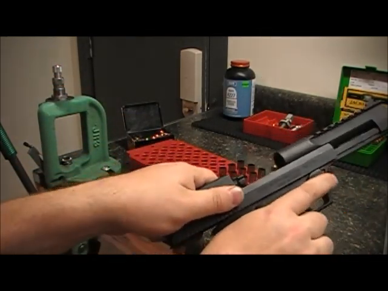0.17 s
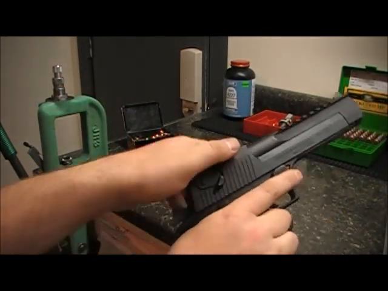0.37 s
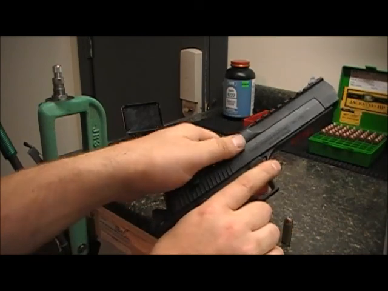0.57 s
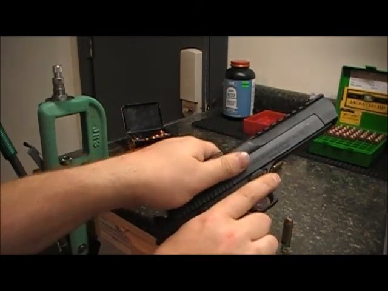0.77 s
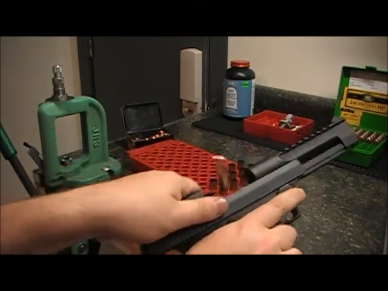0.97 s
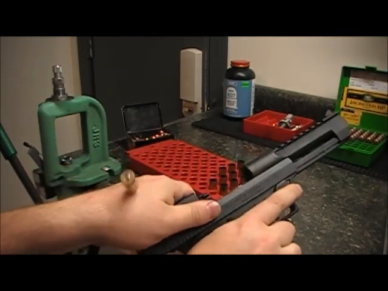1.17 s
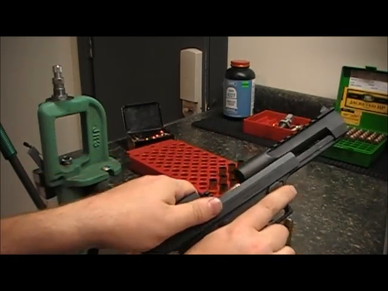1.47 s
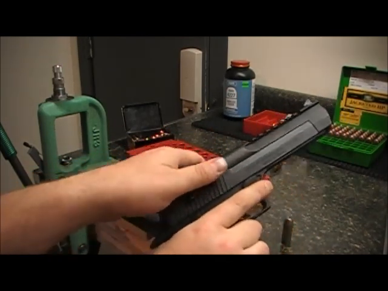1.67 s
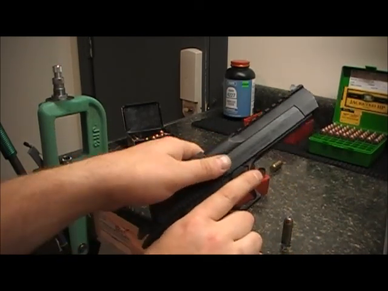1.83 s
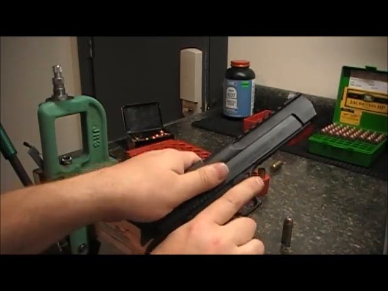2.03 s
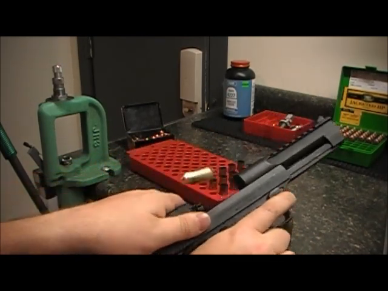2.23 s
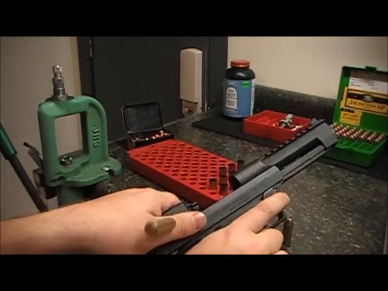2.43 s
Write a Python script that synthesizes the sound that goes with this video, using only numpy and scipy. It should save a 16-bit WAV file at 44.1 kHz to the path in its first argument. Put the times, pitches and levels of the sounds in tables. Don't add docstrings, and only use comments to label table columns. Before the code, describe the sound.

Loud steel clacks and scrapes of a big handgun's slide being worked, ejected rounds clicking on a countertop

```python
import sys
import numpy as np
from scipy import signal
from scipy.fft import rfft, irfft
from scipy.io import wavfile
from scipy.ndimage import uniform_filter1d

SR = 44100
rng = np.random.default_rng(int(sys.argv[2]) if len(sys.argv) > 2 else 0)


def amplitude_ratio(level_db):
    exponent = np.asarray(level_db, float) / 20
    return 10 ** exponent


def store_pcm(level_fs):
    pcm = np.round(np.clip(level_fs, -1, 1) * 32767).astype(np.int16)
    wavfile.write(sys.argv[1], SR, np.atleast_2d(pcm).T)


N = 114660


def evened(x):
    return x / np.sqrt(np.mean(x ** 2) + 1e-20)


def peaked(x):
    return x / (abs(x).max() + 1e-12)


def read(points, hz):
    f, value = np.transpose(points)
    return np.interp(np.log(hz + 1), np.log(f + 1), value)


def add(mix, s, sound):
    part = mix[round(s * SR):][:len(sound)]
    part += sound[:len(part)]


def strike(mix, s, db, lift, sound):
    add(mix, s, amplitude_ratio(db) * lift[round((s + 0.002) * SR)] * sound)


def colour(points, size=512):
    hz = abs(np.fft.fftfreq(4096, 1 / SR))
    log_gain = np.log(amplitude_ratio(read(points, hz)))
    return np.fft.ifft(np.exp(np.conj(signal.hilbert(log_gain)))).real[:size]


def shaped(points):
    gain = amplitude_ratio(read(points, np.fft.rfftfreq(N, 1 / SR)))
    return evened(irfft(rfft(rng.standard_normal(N)) * gain, N))


def ring(modes, length, spread_db, detune=0.0047):
    hz, db, t60 = np.transpose(modes)[:, :, None]
    t = np.arange(0, length, 1 / SR)
    chance = rng.standard_normal((len(modes), 2))
    decay = amplitude_ratio(db + spread_db * chance[:, :1] - 60 * t / t60)
    tone = np.sin(2 * np.pi * hz * (1 + detune * chance[:, 1:]) * t)
    return (decay * tone).sum(0)


# f/Hz, level/dB
FLOOR_MID_SPECTRUM = [(30, -18), (200, -6), (500, -8), (1500, 0), (3500, 0), (8000, -3), (12500, -8),
                      (14500, -30)]
FLOOR_SIDE_SPECTRUM = [(30, -18), (300, 0), (4000, -5), (14000, -54)]


def background():
    return np.array([amplitude_ratio(-60) * shaped(FLOOR_MID_SPECTRUM), amplitude_ratio(-65) * shaped(FLOOR_SIDE_SPECTRUM)])


def mains_hum():
    return amplitude_ratio(-81) * np.sin(2 * np.pi * 120 * np.arange(N) / SR)


# f/Hz, level/dB, t60/s
KNOCK_MODES = [(850, -3, 0.004), (1360, 0.5, 0.0018), (1800, 13, 0.0027), (2870, 4, 0.0076)]


def distant_knock():
    out = np.zeros(N)
    add(out, 0.0074, amplitude_ratio(-23) * ring(KNOCK_MODES, 0.067, 0))
    return out


# f/Hz, t60/s
ROOM_DECAY = [(300, 0.91), (1200, 0.44), (3500, 0.46), (8000, 0.41), (13000, 0.25)]
# f/Hz, level/dB
ROOM_MID_SPECTRUM = [(300, -5), (800, 6.5), (2000, 5), (8000, 4.5), (13000, 6)]
ROOM_SIDE_SPECTRUM = [(200, -32), (700, -22.5), (2500, -1.5), (8000, 0.5), (13000, 9.5)]


def room(x):
    spacing, delay_s, rise_s = 20, 0.00048, 0.0024
    taps = np.zeros((2, SR))
    at = np.arange(0, SR - spacing, spacing) + rng.integers(0, spacing, (2, (SR - 1) // spacing))
    np.put_along_axis(taps, at, rng.choice([-1., 1.], at.shape), 1)
    hz, t, bands = signal.stft(taps, SR, nperseg=256)
    spectrum = np.array([read(ROOM_MID_SPECTRUM, hz), read(ROOM_SIDE_SPECTRUM, hz)])
    db = spectrum[:, :, None] - 60 * t / read(ROOM_DECAY, hz)[:, None]
    tail = signal.istft(bands * amplitude_ratio(db), SR, nperseg=256)[1][:, :SR] / 50
    tail = tail * np.clip((np.arange(SR) / SR - delay_s) / rise_s, 0, 1) * 2
    return signal.fftconvolve(x[None], tail, axes=1)[:, :N]


# f/Hz, level/dB, t60/s
FRAME_MODES = [(745, -22.5, 0.075), (913, -5.5, 0.033), (1500, -5, 0.097), (1820, -4, 0.045),
               (2200, 5.5, 0.025), (2500, 6, 0.013), (2965, 12, 0.007), (3850, 22, 0.0025)]
SLIDE_MODES = [(5270, -34, 0.0035), (6660, -19, .006), (7260, 1, 0.0041), (8180, 1, 0.015),
               (8450, 7.5, 0.0025), (9250, 11, 0.0023), (10400, -4, 0.0073)]
# f/Hz, level/dB
CRACK_SPECTRUM = [(200, -52.5), (600, -17.5), (2000, 0), (4800, -3.5), (8500, -2), (12500, -12.5),
                  (15500, -50)]


def clack(treble_db, length, own_hz):
    t = np.arange(0, 0.06, 1 / SR)
    grit = rng.standard_normal(len(t)) * amplitude_ratio(1.5 * rng.exponential(1, len(t)))
    drive = grit * np.minimum(t / 0.00024, 1) * amplitude_ratio(-30 * t / max(length, 1e-3))
    frame = evened(ring(FRAME_MODES, 0.04, spread_db=2))
    slide = evened(ring(SLIDE_MODES, 0.04, spread_db=2))
    body = amplitude_ratio(-treble_db / 2) * frame + amplitude_ratio(treble_db / 2) * slide
    body = body / np.linalg.norm(body) * min(length / 0.018, 1)
    own = ring([(own_hz, 0, 35 / own_hz)], 0.03, 0, 0)
    add(body, 0, amplitude_ratio(-2) * own / np.linalg.norm(own))
    tilted = [(hz, db + treble_db * (np.clip(hz / 5000, 0.5, 1.5) - 1)) for hz, db in CRACK_SPECTRUM]
    crack = colour(tilted)
    add(body, 0, amplitude_ratio(5) * crack / np.linalg.norm(crack))
    return peaked(signal.fftconvolve(drive, body))


# t/s, heard peak level/dB, treble share/dB, length/s, loudest ring f/Hz
SLIDE_HOME = [(.168, -17.5, 5, 0.008, 6840), (0.201, -8, -3, 0.0081, 1430), (0.183, -45, -32, 0.014, 500),
              (0.2047, -4, -3, 0.012, 2190), (0.2185, -10.5, 3, 0.017, 2500),
              (0.2452, -13, -4, 0.014, 8500), (0.2474, -9, -4, .012, 2270),
              (0.2548, 0.5, -8.5, 0.014, 2000), (0.265, 1.5, 4.5, 0.028, 8150), (0.2805, -5, 4, 0.14, 7400),
              (0.285, -6.5, 1, 0.06, 8200), (1.4352, -15, -3, 0.013, 2800),
              (1.4433, -5.5, -0.5, 0.0086, 8140), (1.475, -18.5, -9, 0.0057, 2720),
              (1.506, -16, -13, 0.013, 2500), (1.523, -17.5, -16, 0.032, 2200),
              (1.529, -17.5, -17, 0.03, 2350), (1.534, -14, -8, .015, 2320), (1.5407, -1, -1, 0.018, 2270),
              (1.5447, 2.5, -1.5, 0.004, 3490), (1.5539, 0.5, 11, 0.011, 6860),
              (1.568, -4.5, 31, 0.046, 9600), (1.575, -0.5, 4.5, 0.04, 7300), (1.585, -4.5, 2, 0.037, 9400)]
FIRST_PULL = [(0.846, -27, -18, 0.0046, 2340), (0.8477, -16, -8, 0.008, 3650),
              (0.859, -14.5, -20, 0.012, 1710), (0.8697, -17, 18, 0.0055, 7500),
              (0.871, -12, -23.5, 0.016, 2510), (0.8803, -7.5, 19, 0.0016, 9600),
              (.889, -19.5, 9, 0.0036, 7600), (0.8907, 0, 0, 0.0058, 8070), (.9065, -11.5, -11, 0.01, 7550),
              (0.9215, 0, 0, 0.0078, 7100), (0.9394, -4.5, -3, 0.0024, 8700), (0.944, -7.5, 8, .012, 2890),
              (0.9532, -9.5, -17, 0.0098, 3600), (0.9645, -7.5, -2.5, 0.008, 3960),
              (0.9923, -21, 5, .003, 9200), (0.9958, 2.5, -0.5, 0.0059, 2160),
              (1.0059, -3, 7, 0.0098, 1880), (1.0105, -3.5, 5.5, 0.0027, 4800),
              (1.0148, 0.5, 2.5, 0.012, 3800)]
SECOND_PULL = [(2.021, -24.5, -15, 0.014, 2500), (2.0267, -7, -1, 0.0022, 5400),
               (2.037, -4.5, 6, 0.0043, 6650), (2.042, -9.5, 2.5, 0.042, 7400),
               (2.057, -12, -11, 0.023, 2050), (2.0768, -14, 12, 0.0036, 7720),
               (2.0811, -2.5, -10, 0.0073, 2340), (2.111, -4.5, -7.5, 0.0086, 7740),
               (2.115, -12.5, -14, 0.0063, 1710), (2.131, -5, 23, 0.0021, 7300),
               (2.1434, -6.5, 17, 0.015, 6800), (2.1533, -10, 34, 0.0027, 6430),
               (2.173, -3, -7, 0.011, 2900), (2.183, -1.5, -6.5, 0.013, 7360),
               (2.1995, -21, -14, 0.0057, 9900), (2.204, -13, 5, 0.0014, 9300),
               (2.22, -2.5, -5, 0.0055, 8540), (2.2358, 1, -5.5, 0.011, 2840),
               (2.243, -2.5, 4, 0.004, 9200), (2.2484, -5.5, 0, 0.0037, 2950),
               (2.2534, -1, 1, 0.0063, 2150), (2.257, -5, 3, 0.0054, 8140)]


def slide_contacts(lift):
    out = np.zeros(N)
    for s, db, treble_db, length, own_hz in SLIDE_HOME + FIRST_PULL + SECOND_PULL:
        strike(out, s, db, lift, clack(treble_db, length, own_hz))
    return out


# start t/s, end t/s, heard level/dB
RAIL_STROKES = [
    (0.185, 0.285, -31.5),
    (0.831, 0.986, -37),
    (1.392, 1.43, -48.5),
    (1.446, 1.557, -44.5),
    (2.018, 2.252, -33.5),
]


def rail_friction(lift):
    t = np.arange(N) / SR
    asperities = rng.standard_normal(N) * amplitude_ratio(2.7 * rng.exponential(1, N))
    unevenness = evened(uniform_filter1d(rng.standard_normal(N), size=200))
    grit = asperities * amplitude_ratio(4.9 * unevenness)
    rub = evened(signal.oaconvolve(grit, ring(FRAME_MODES + SLIDE_MODES, 0.063, 0))[:N])
    stroke = sum(amplitude_ratio(db) * np.clip(np.minimum(t - a, b - t) / 0.0061, 0, 1) for a, b, db in RAIL_STROKES)
    return rub * stroke * lift


# t/s, squeeze/dB
SQUEEZE_EVENTS = [(0.255, 15), (0.92, 10), (0.9927, 6), (1.0108, 7), (1.54, 21), (1.7468, 6.5),
                  (2.0800, 6.5), (2.2359, 12)]


def squeeze_db():
    t = np.arange(N) / SR
    release_db_per_s = 83.5
    lost = [np.clip(db - release_db_per_s * (t - s), 0, None) * (t >= s) for s, db in SQUEEZE_EVENTS]
    return uniform_filter1d(np.max(lost, 0), size=60)


# t/s, heard level/dB
THUMP_EVENTS = [(0.255, -35), (0.288, -35), (0.593, -38.5), (0.92, -40), (0.999, -46), (1.014, -40),
                (1.552, -35), (1.585, -38), (1.746, -39), (2.25, -35)]


def thumps(lift):
    out, t = np.zeros(N), np.arange(0, 0.05, 1 / SR)
    hz, decay_s, rise_s = 88, 0.0013, 0.00028
    push = np.exp(-t / decay_s) * np.cos(2 * np.pi * hz * t) * np.minimum(t / rise_s, 1)
    for s, db in THUMP_EVENTS:
        strike(out, s, db, lift, push)
    return out


# t/s, heard level/dB
BREECH_BLOWS = [
    (0.266, -9.5),
    (1.587, -14),
]
# f/Hz, level/dB, t60/s
BREECH_MODES = [(1590, -5, 0.045), (1726, 4, 0.01)]


def breech(lift):
    out = np.zeros(N)
    for s, db in BREECH_BLOWS:
        strike(out, s, db, lift, ring(BREECH_MODES, 0.2, 0, 0))
    return out


# t/s, heard peak level/dB
CARTRIDGE_BOUNCES = [(0.4515, -1), (0.5895, -11), (0.5948, -0.5), (.655, -34), (.6928, -27), (0.7153, 0),
                     (0.8067, -1.5), (1.7462, 0), (2.3865, -17), (2.4475, -19), (2.4975, -17),
                     (2.5385, -20), (2.5685, -25)]
# f/Hz, level/dB
TICK_SPECTRUM = [(400, -22), (2500, -12), (6100, 0.5), (9500, 5.5), (12500, -8.5), (15500, -50)]


def cartridge_ticks(lift):
    out, t = np.zeros(N), np.arange(300) / SR
    for s, db in CARTRIDGE_BOUNCES:
        drive = 0.15 * rng.standard_normal(300) * amplitude_ratio(-60 * t / 0.003)
        drive[0] = 1
        strike(out, s, db, lift, peaked(np.convolve(drive, colour(TICK_SPECTRUM))))
    return out


# t/s, heard level/dB
BARREL_BLOWS = [
    (.952, -20),
    (.964, -13),
    (1.572, -21.5),
    (2.083, -24),
    (2.182, -17.5),
    (2.2, -10.5),
]
# f/Hz, level/dB, t60/s
BARREL_MODES = [(3786, 4, 0.056), (9630, 0.5, 0.036)]


def barrel(lift):
    out = np.zeros(N)
    for s, db in BARREL_BLOWS:
        strike(out, s, db, lift, ring(BARREL_MODES, 0.13, 0, 0.00056))
    return out


# f/Hz, width/Hz, level/dB, t60/s
SPRING_MODES = [(3320, 60, -29, .55), (3400, 60, -30, .5), (3490, 40, -24.5, .55), (3840, 60, -35, .55),
                (1829, 5, -55, 9.0)]


def spring():
    out, t = np.zeros(N), np.arange(SR) / SR
    damped = np.clip((0.42 - t) * 50, 0, 1)
    for hz, width, db, t60 in SPRING_MODES:
        pole = np.exp(-np.pi * width / SR)
        noise = rng.standard_normal(2 * SR) + 1j * rng.standard_normal(2 * SR)
        wobble = signal.lfilter([1], [1, -pole], noise)[SR:]
        phasor = wobble / abs(wobble).mean() + 20 / width
        tone = evened((phasor * np.exp(2j * np.pi * hz * t)).real)
        add(out, 1.016, amplitude_ratio(db - 60 * t / t60) * damped * tone)
    return out


# t/s, heard level/dB
CASE_BLOWS = [
    (2.037, -38),
    (2.2, -46),
    (2.387, -44),
    (2.498, -46),
]


def brass_case(lift):
    out, hz, t60 = np.zeros(N), 12740, 0.25
    for s, db in CASE_BLOWS:
        strike(out, s, db, lift, ring([(hz, 0, t60), (hz + 45, -3, t60)], 0.27, 0, 0))
    return out


# f/Hz, level/dB
PORT_SPECTRUM = [(250, 4), (600, -3), (1400, -12), (2500, -25)]


def microphone_side(mid):
    gain = amplitude_ratio(read(PORT_SPECTRUM, np.fft.rfftfreq(N, 1 / SR)))
    return irfft(1j * rfft(mid) * gain, N)


def scene():
    lift = amplitude_ratio(squeeze_db())
    gun = slide_contacts(lift) + rail_friction(lift) + breech(lift) + barrel(lift) + spring()
    brass = cartridge_ticks(lift) + brass_case(lift)
    wet = room(amplitude_ratio(-1.5) * gun + brass + distant_knock())
    low_cut = signal.butter(3, 435, "high", fs=SR, output="sos")
    mid, side = signal.sosfilt(low_cut, wet + [gun + brass, 0 * gun])
    side = side + microphone_side(mid)
    low = thumps(lift) + mains_hum()
    floor_mid, floor_side = background()
    mid = mid + low + floor_mid
    side = side + 0.28 * low + floor_side
    return np.array([mid + side, mid - side])


def top_cut(x):
    return signal.sosfilt(signal.butter(12, 16490, fs=SR, output="sos"), x)


def record(dry):
    x = dry / amplitude_ratio(squeeze_db())
    ceiling = 2.2
    x = ceiling * np.tanh(x / ceiling)
    x = signal.oaconvolve(x, signal.firwin(255, 15800, fs=SR)[None], "same")
    return top_cut(np.clip(x, -1, 1))


dry = scene()
out = record(dry)
store_pcm(out)
```